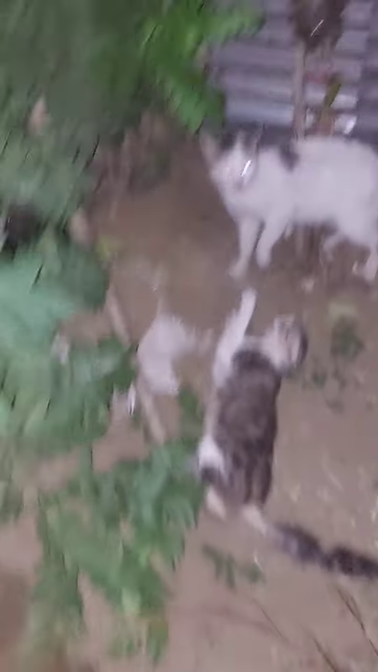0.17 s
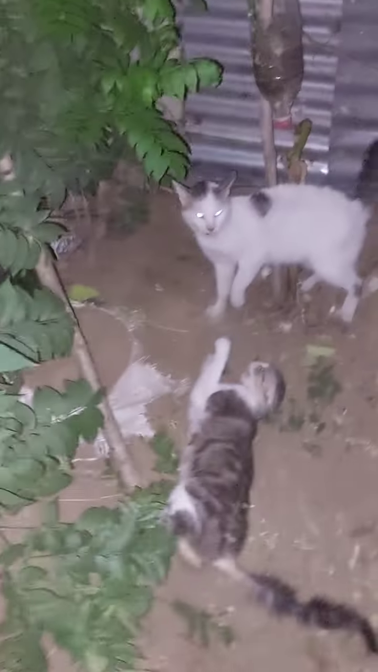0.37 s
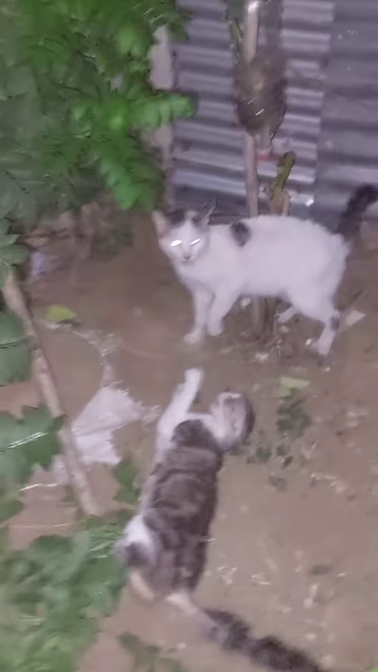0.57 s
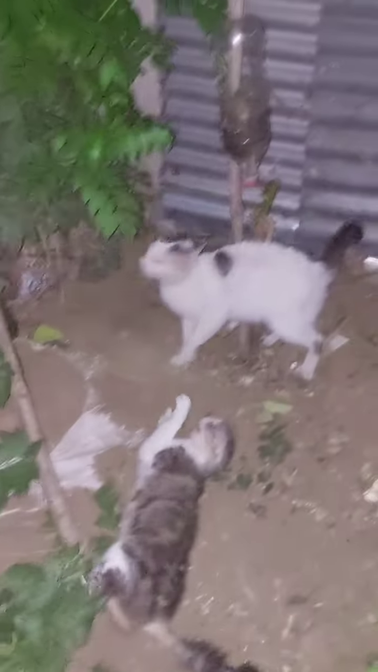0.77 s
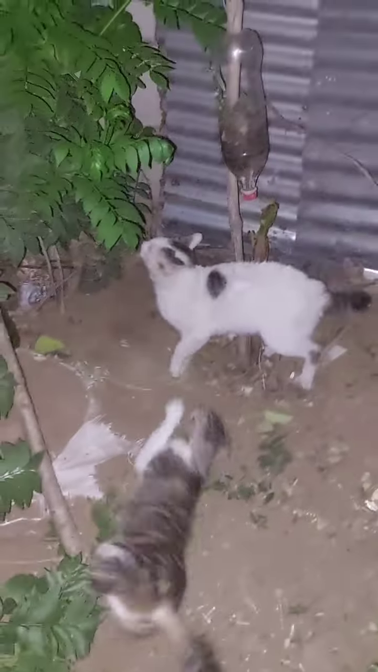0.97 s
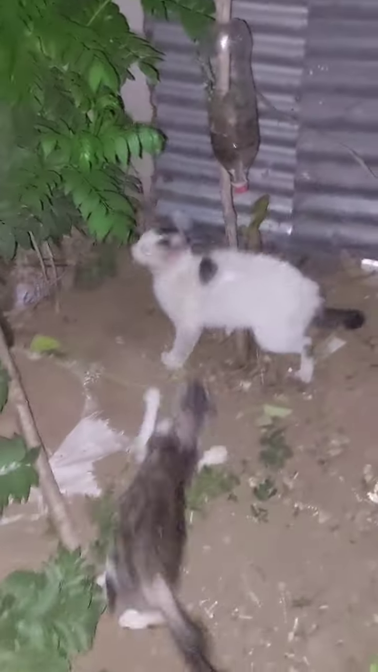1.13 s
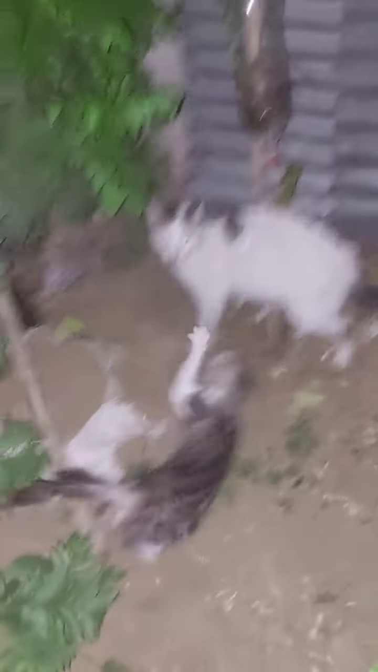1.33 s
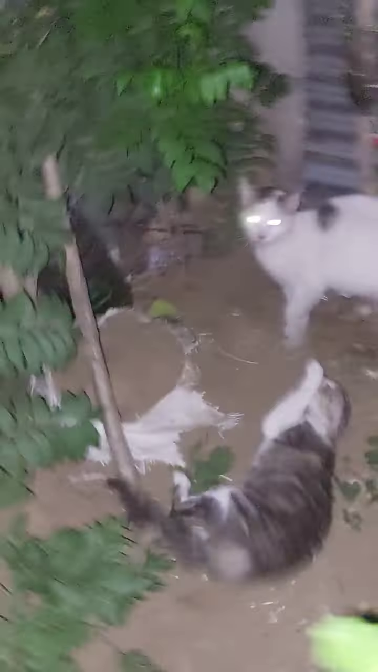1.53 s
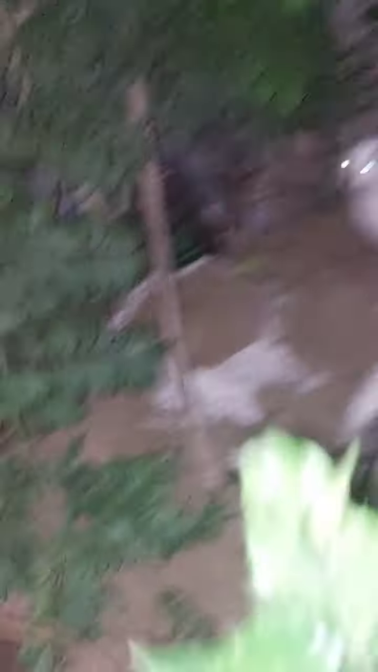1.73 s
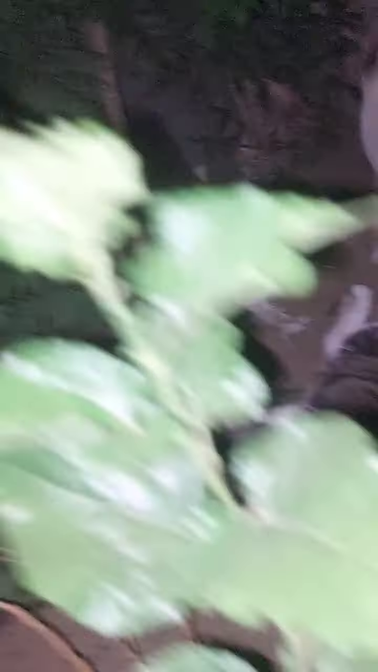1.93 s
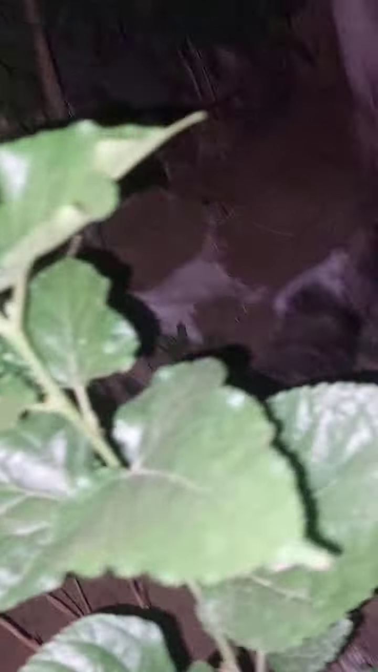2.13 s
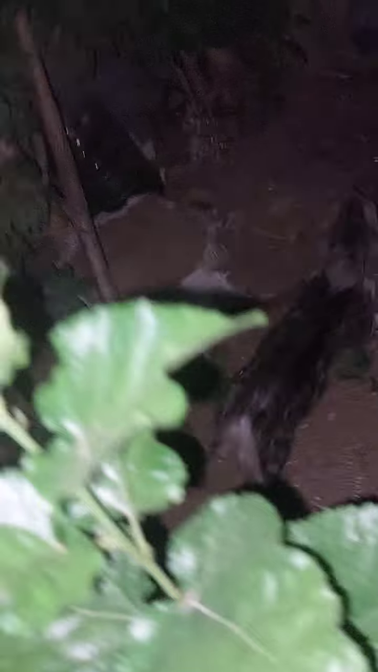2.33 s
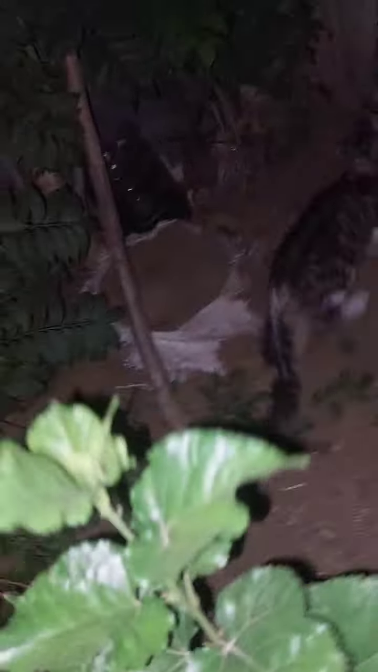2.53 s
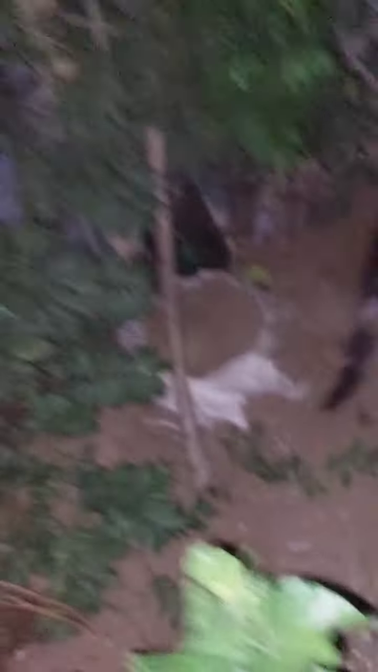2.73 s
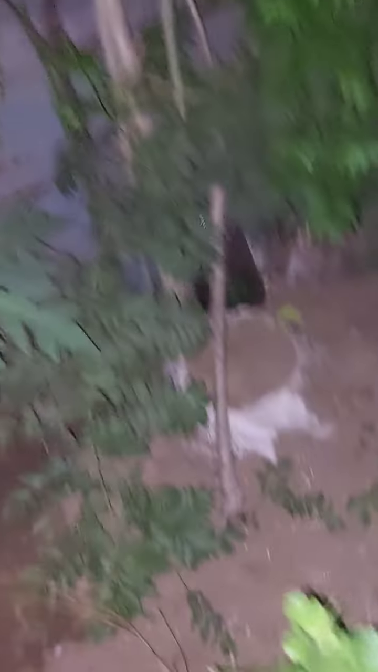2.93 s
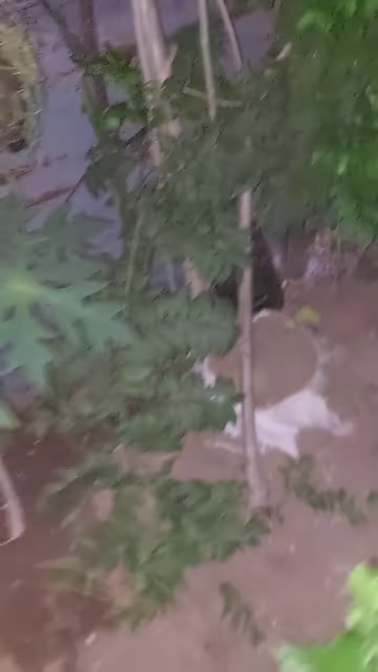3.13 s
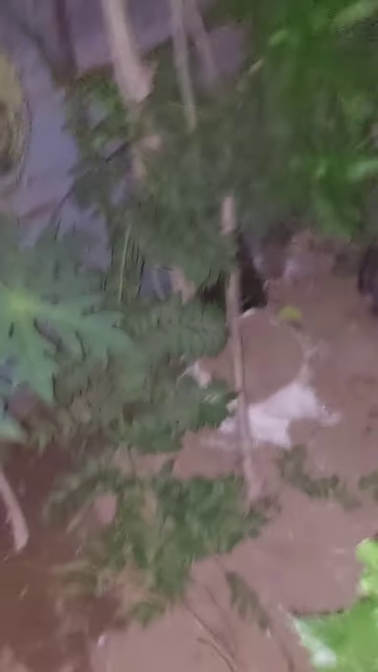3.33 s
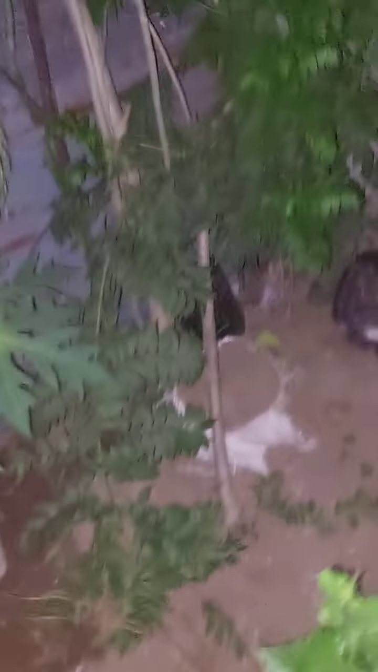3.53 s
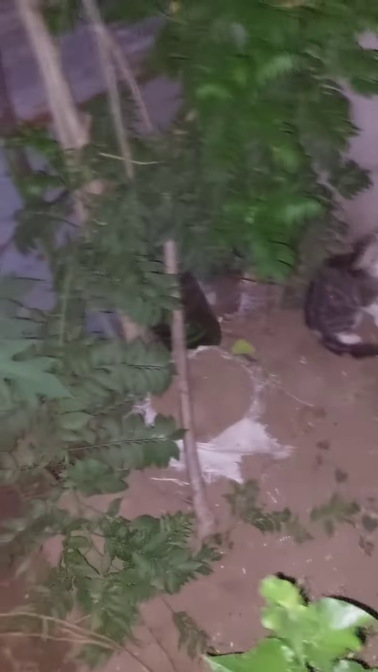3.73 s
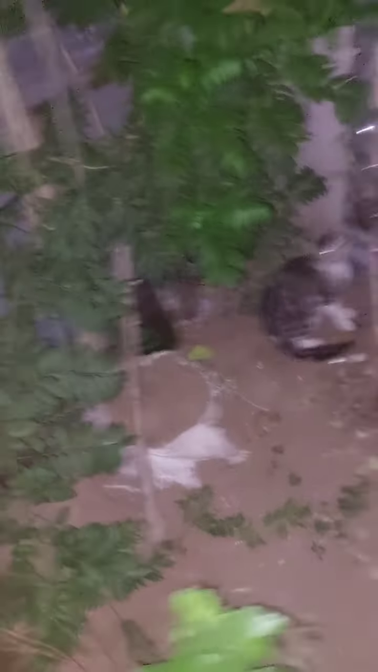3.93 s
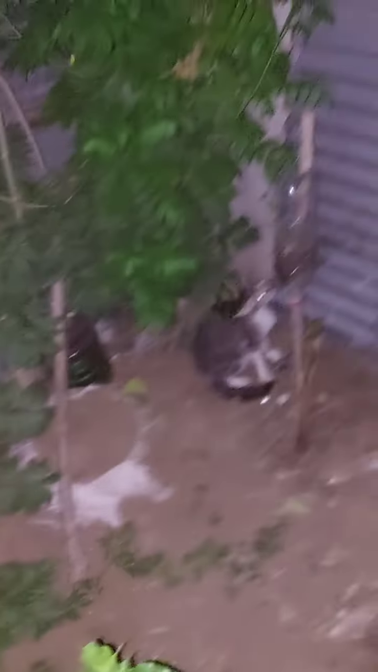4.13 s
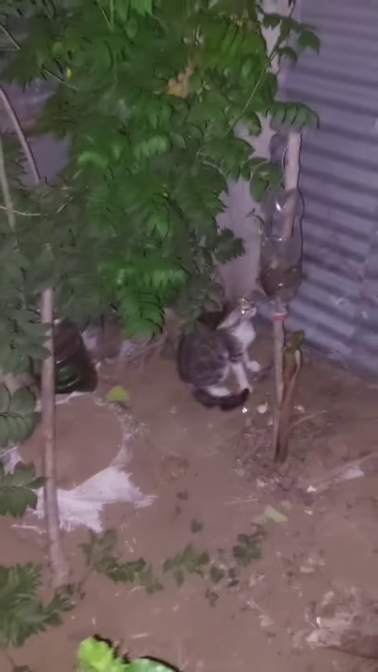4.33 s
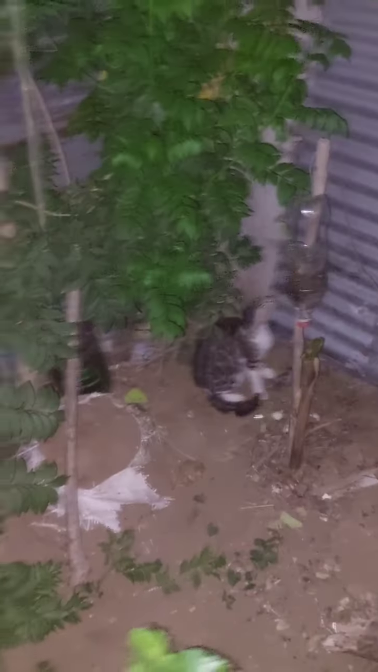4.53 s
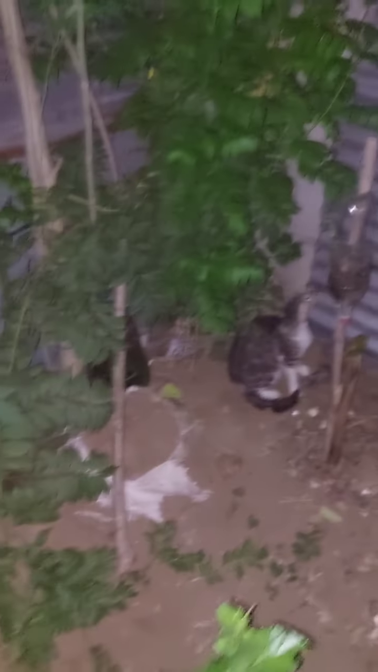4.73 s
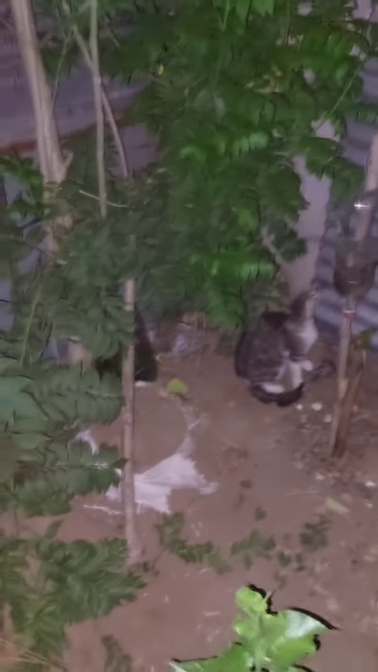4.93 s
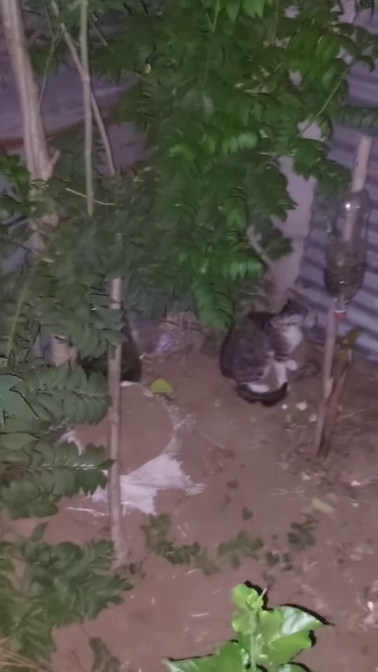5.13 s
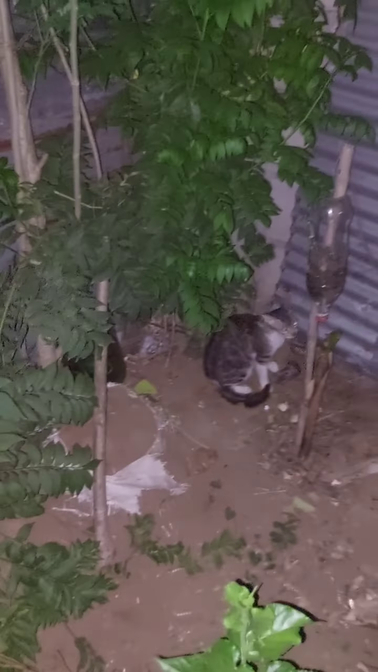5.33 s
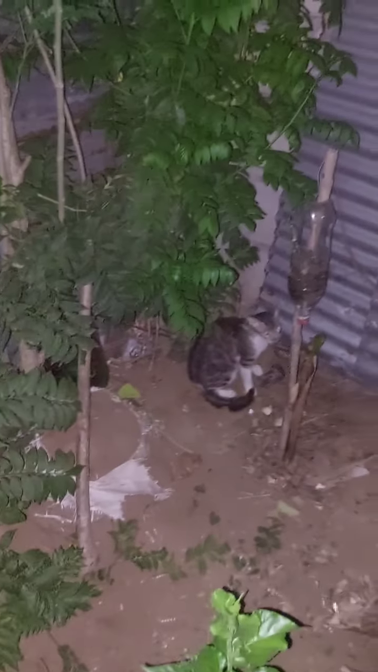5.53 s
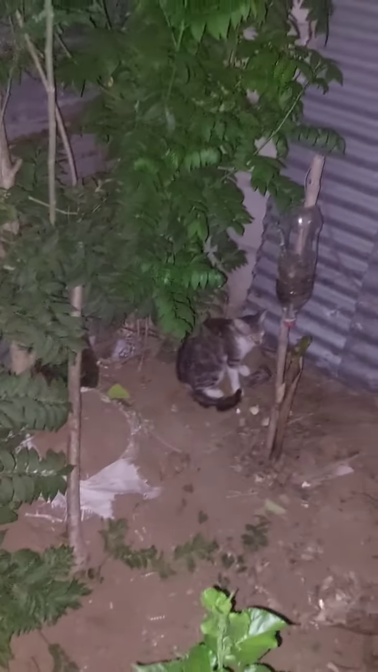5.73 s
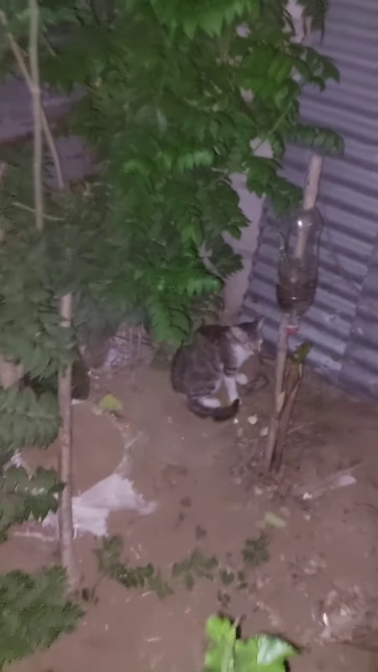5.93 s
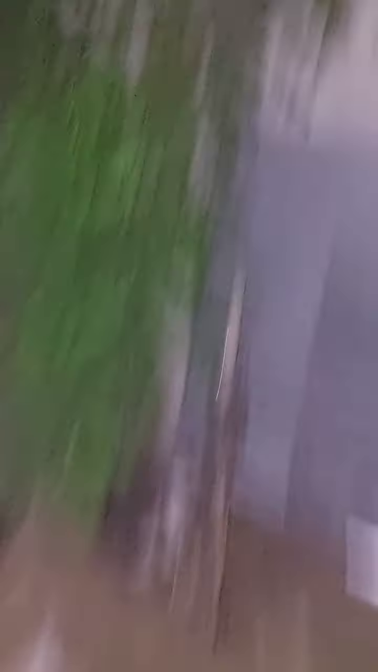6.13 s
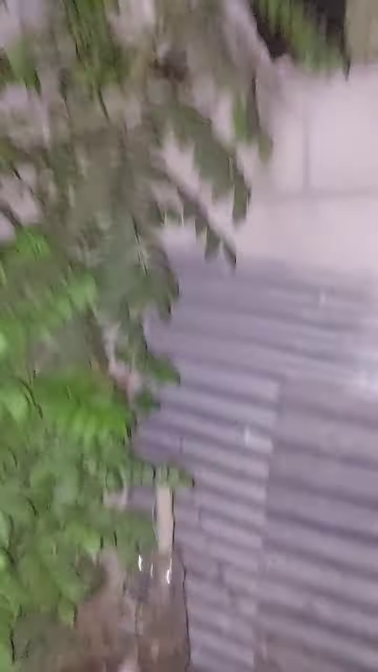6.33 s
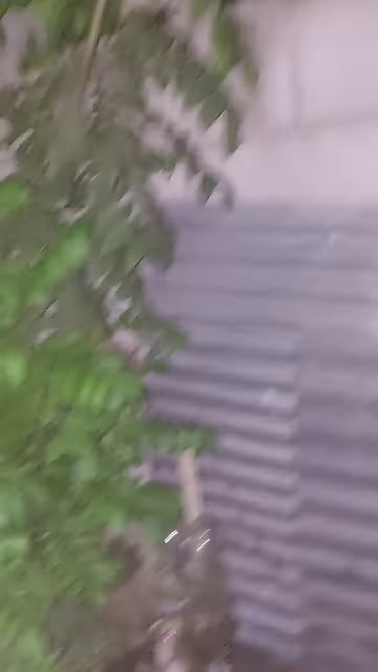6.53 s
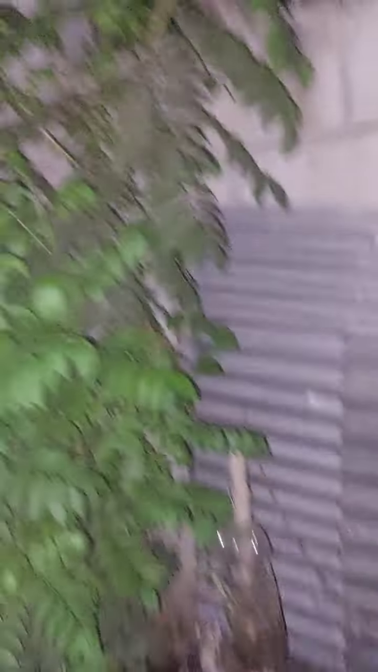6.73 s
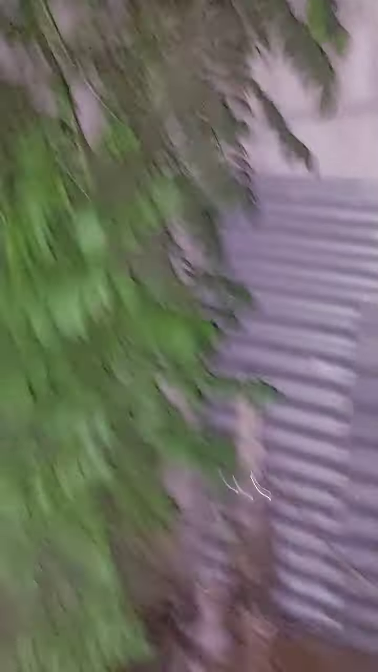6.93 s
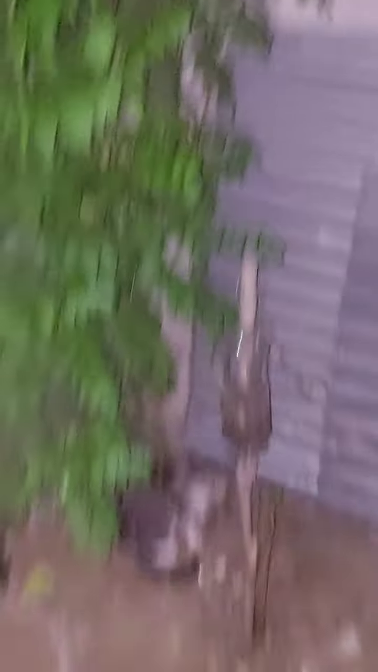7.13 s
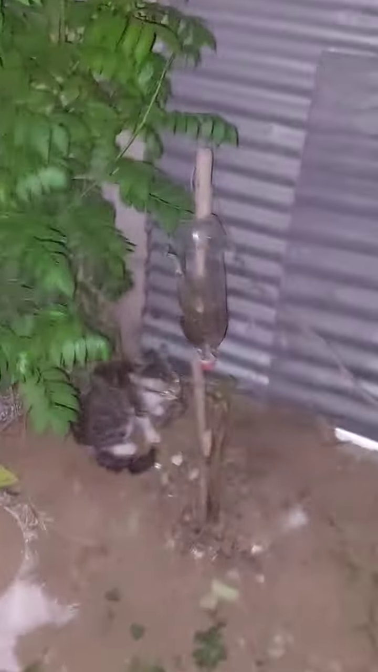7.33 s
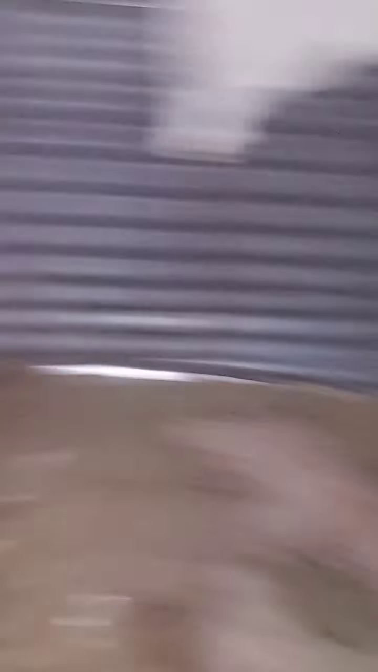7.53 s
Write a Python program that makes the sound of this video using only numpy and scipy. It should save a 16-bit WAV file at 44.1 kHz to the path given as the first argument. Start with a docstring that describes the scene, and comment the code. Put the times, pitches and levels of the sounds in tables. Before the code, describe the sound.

A handheld microphone hears a cat's yowl strain into a screech and end with a throaty grunt. Bodies then thump and scrape against a tin fence, leaves thrash, claws squeal on metal and a cat spits. After about four seconds the fight stops, leaving pulsing crickets, thin distant cries, hoarse far barks and a night bird. Late leaf brushes and a low puff of wind hit the microphone. Everything is on the right; dull hiss on the left.

```python
"""A yard at night: two cats face off. One long yowl of vocal-fold harmonics rises and breaks into a screech.
Then they scuffle: grain noise drums and scrapes on a tin fence and rustles in leaves, while gliding tones
squeak as claws on the sheet. Filtered noise trills as insects, a night bird chirps in falling tones, and
dogs bark far off in hoarse harmonics. Only the right microphone is open; the left one gives a dull hiss."""
import sys
import numpy as np
from scipy import signal
from scipy.fft import rfft, irfft, next_fast_len
from scipy.io import wavfile
from scipy.ndimage import uniform_filter1d, map_coordinates

SR = 44100
rng = np.random.default_rng(int(sys.argv[2]) if len(sys.argv) > 2 else 0)


def dump(signal):
    """Clip the signal to [-1, 1] and save it as 16-bit WAV at the path in sys.argv[1]."""
    limited = np.clip(np.atleast_2d(signal).T, -1, 1)
    pcm = np.round(limited * 32767).astype(np.int16)
    wavfile.write(sys.argv[1], SR, pcm)


N = 334260
T = np.arange(N) / SR
STRAIN_S = 0.88  # the cat's voice starts to strain here


def amp(db):
    """Gain of a level in dB."""
    return 10 ** (np.asarray(db) / 20)


def unit(x):
    """x at rms 1."""
    return x / np.sqrt(np.mean(x ** 2) + 1e-20)


def along(points, hz):
    """Read a (f/Hz, value) curve on a log frequency axis."""
    f, v = np.transpose(points)
    return np.interp(np.log(hz + 1), np.log(f + 1), v)


def curves(rows):
    """One value per sample for each column after the time."""
    s, *cols = np.transpose(rows)
    return [np.interp(T, s, c) for c in cols]


def during(rows):
    """1 over the time span of a table, with soft edges."""
    inside = (T >= rows[0][0]) & (T <= rows[-1][0])
    return uniform_filter1d(1. * inside, size=400)


def wobble(rate):
    """A smooth random curve, rate knots a second."""
    coarse_s = np.arange(N // 8 + 2) * 8 / SR  # drawn on every eighth sample
    knots = rng.standard_normal(8192)
    return np.interp(T, coarse_s, map_coordinates(knots, [coarse_s * rate], mode="wrap"))


def swell(s, rise_s, hold_s, fall_db_per_s):
    """An envelope that rises from time s to 1, holds and dies away."""
    rise = np.clip((T - s) / max(rise_s, 1 / SR), 0, 1)
    return rise * amp(-fall_db_per_s * np.maximum(T - s - rise_s - hold_s, 0))


def coloured(x, spectrum):
    """x through a (f/Hz, level/dB) spectrum, at rms 1."""
    size = next_fast_len(N + 8192)
    gain = amp(along(spectrum, np.fft.rfftfreq(size, 1 / SR)))
    return unit(irfft(rfft(x, size) * gain, size)[:N])


def noise(spectrum):
    """Steady noise of rms 1."""
    return coloured(rng.standard_normal(N), spectrum)


def grains(spectrum, rate, patchy_db):
    """Dense tiny contacts of uneven size; each patch of contact favours other frequencies."""
    hits = rng.standard_normal(N) * (rng.random(N) < rate / SR)
    z = signal.stft(hits, nperseg=512)[2]
    field = uniform_filter1d(rng.standard_normal(z.shape), size=6, axis=0)
    field = uniform_filter1d(field, size=6, axis=1)
    patchy = signal.istft(z * amp(patchy_db * unit(field)), nperseg=512)[1]
    return coloured(patchy[:N], spectrum)


def add(track, s, sound):
    """Mix a sound into a track at time s."""
    part = track[max(round(s * SR), 0):][:len(sound)]
    part += sound[:len(part)]


def bursts(rows, spectrum):
    """Bursts of small contacts that start at once and die away, for (t/s, level/dB, t60/s) rows."""
    force, t = np.zeros(N), np.arange(SR // 3) / SR
    for s, db, t60 in rows:
        add(force, s, amp(db - 9 - 60 * t / t60))
    return force * grains(spectrum, rate=9900, patchy_db=2)


def whistles(rows, waver, waver_rate):
    """Short gliding tones of unsteady pitch, for (t/s, length/s, f/Hz, glide/octaves, level/dB rms) rows."""
    out, drift = np.zeros(N), waver * wobble(waver_rate)
    for s, length, hz, glide, db in rows:
        u = np.linspace(0, 1, int(length * SR))
        pitch = hz * 2 ** (glide * (u - .5)) * (1 + drift[int(s * SR):][:len(u)])
        tone = np.sin(2 * np.pi * np.cumsum(pitch) / SR)
        add(out, s, amp(db) * unit(np.sin(np.pi * u) * tone))
    return out


def cat(width_hz=170, jitter=.013, shake=0.042, flutter=0.93, rasp=0.72, half_db=-5, teeth_db=-9, thin_db=5):
    """Fold harmonics pass the throat and a tuned mouth; under strain the folds shake and double their period."""
    # one long yowl that sags, climbs and ends in a screech: t/s, pitch/Hz, level/dB
    yowl_path = [(0.0, 569, -26), (0.018, 569.5, -27), (0.182, 546.5, -25.5), (0.392, 537.2, -28.5),
                 (0.494, 531.6, -26), (0.646, 542.9, -28.5), (0.742, 558.8, -23), (0.772, 593.7, -23),
                 (0.794, 595.7, -23), (0.936, 729.5, -26), (0.954, 819, -22.5), (0.966, 769, -30),
                 (0.984, 656.7, -30), (1.02, 621.6, -33), (1.04, 594, -24.5), (1.084, 607.8, -30.5),
                 (1.102, 647.3, -29), (1.128, 654.3, -26.5), (1.136, 704, -20), (1.144, 658, -24),
                 (1.154, 564.6, -28), (1.174, 536, -18.5), (1.2, 598, -26), (1.226, 547.5, -20.5),
                 (1.252, 620.3, -27.5), (1.27, 580.6, -28), (1.284, 593.4, -32.5), (1.3, 710, -25),
                 (1.335, 689.1, -49.5)]
    # throat resonances: f/Hz, level/dB
    throat = [(300, -17.5), (560, -13), (1100, -11), (1650, -2.5), (2200, -7.5), (2750, -6), (3250, -3),
              (3800, -21.5), (4350, -20.5), (4950, -16), (5600, -30.5), (7500, -34), (10000, -45.5),
              (15000, -43.5)]
    mouth_harmonic, mouth_max_hz = 3, 1990  # the mouth follows this harmonic but cannot tune higher
    air_db = -33  # faint throat turbulence, relative to the voice, even when it is pure
    pitch, level_db = curves(yowl_path)
    mouth_hz = np.minimum(mouth_harmonic * pitch, mouth_max_hz)
    rough, lift_db = roughness(), brightness(pitch, level_db)
    drift = .0015 * wobble(25)
    pitch = pitch * (1 + drift + shake * np.sqrt(rough) * wobble(130) + jitter * rough * wobble(600))
    phase = 2 * np.pi * np.cumsum(pitch) / SR

    live = T < yowl_path[-1][0] + .1
    strained = T[live] > STRAIN_S
    voice, power = np.zeros(N), np.full(N, 1e-12)
    for k in np.arange(1, 49) / 2:
        hz = k * pitch[live]
        # each harmonic swells and fades at random on its own
        flicker_db = min(.4 + .9 * abs(k - mouth_harmonic), 3.8) * wobble(10)[live]
        lift_share = along([(2200, 0.077), (3300, 0.28)], hz)
        colour_db = along(throat, hz) + lift_db[live] * lift_share + flicker_db
        colour_db = colour_db - thin_db * strained * (k <= 1)  # strain thins the fundamental and below
        gain = amp(colour_db) * (1 + 8 / (1 + ((hz - mouth_hz[live]) / width_hz) ** 2))
        if k % 1:
            # lines halfway between the harmonics
            gain = gain * amp(half_db) * np.sqrt(rough[live]) * strained
        fluttering = 1 + flutter * (rough ** 0.5 * wobble(220))[live]
        voice[live] += gain * np.sin(k * phase[live]) * fluttering
        power[live] += gain ** 2 / 2

    # turbulent air rings the same throat once a cycle, and whistles past the teeth
    teeth = noise([(2400, -35.0), (3300, -6), (3900, 6.5), (4400, -14.0), (5100, -6), (6500, -26.5)])
    air = (0.47 * noise(throat) + amp(teeth_db + lift_db) * teeth) * (1 + np.cos(phase))
    # a noisy band at the mouth's own resonance
    air = air + unit(wobble(520) * np.sin(2 * np.pi * np.cumsum(mouth_hz) / SR))
    tremble = amp(3.5 * np.sqrt(rough) * wobble(70))
    mixed = voice / np.sqrt(power) + amp(air_db) * noise(throat) + rasp * rough * air
    return during(yowl_path) * amp(level_db) * tremble * mixed / np.sqrt(1 + rough ** 2)


def roughness():
    """Roughness of the folds, 0-1: pure at first, then strained, and harsh wherever the voice cracks."""
    # the voice cracks: t/s, length/s, added roughness/0-1
    cracks = [(0.742, 0.1, 0.05), (0.944, 0.068, 0.22), (1.125, .09, .35), (1.197, 0.19, 0.25)]
    pure, strained = 0.003, 0.045
    rough = np.where(T < STRAIN_S, pure, strained)
    for s, length, harsh in cracks:
        rough = rough + harsh * np.sin(np.pi * np.clip((T - s) / length, 0, 1))
    return np.clip(rough, 0, 1)


def brightness(pitch, level_db):
    """Upper harmonics hold on as the voice fades, weaken as it climbs, and lift as the teeth are bared, in dB."""
    full_voice_db, dull_db_per_octave = -24, 17
    snarl_s, snarl_open_s, snarl_db = 1.19, .08, 10.5
    snarl = np.clip((T - snarl_s) / snarl_open_s, 0, 1)
    hold_db = np.minimum(full_voice_db - level_db, 6)
    return hold_db - dull_db_per_octave * np.log2(pitch / pitch.min()) + snarl_db * snarl


def grunt(count=5, uneven=0.35):
    """A short throaty grunt: a few slow, uneven fold pulses, each ringing the throat."""
    # throat resonances: f/Hz, width/Hz, level/dB
    grunt_throat = [(245, 15, 3.5), (1430, 170, -9), (1636, 98, 17), (2220, 240, 2.5)]
    start_s, pulse_hz, peak_db = 1.41, 87, -30.5  # the peak is that of each pulse
    out, t = np.zeros(N), np.arange(SR // 20) / SR
    for k in range(count):
        ring = np.zeros(len(t))
        for hz, width, level in grunt_throat:
            tone = np.sin(2 * np.pi * hz * rng.normal(1, 0.091) * t)
            ring += amp(level) * np.exp(-np.pi * width * t) * tone
        pulse_s = start_s + (k + uneven * rng.standard_normal()) / pulse_hz
        add(out, pulse_s, amp(peak_db) * ring / np.abs(ring).max())
    return out


def scuffle():
    """At each lunge bodies drum on the tin and scrape along it while leaves are crushed."""
    # the cats lunge at each other: t/s, rise/s, hold/s, drumming/dB, scrape/dB, rustle/dB
    lunges = [(1.385, 0.016, 0.019, -49.5, -47.5, -54.5), (1.592, 0.11, .01, -115, -57, -67.5),
              (1.7, .008, 0.042, -60, -47.5, -45), (1.757, 0.0052, 0.24, -50.5, -50.5, -54.5),
              (1.885, 0.21, .04, -42.5, -42.5, -45), (2.167, 0.018, 0.074, -44, -34, -22),
              (2.224, 0.097, 0.086, -34, -24, -27.5), (2.526, 0.056, .03, -42, -34.5, -33.5),
              (2.636, 0.059, .01, -35, -37.5, -46.5), (2.798, .025, 0.095, -37.5, -31.5, -39.5),
              (2.89, 0.055, 0.033, -38, -23, -36), (3.058, .02, .03, -38, -28, -41.5),
              (3.167, 0.023, .08, -29, -26.5, -38.5), (3.441, 0.0056, 0.0078, -39, -37, -37.5),
              (3.541, 0.0084, .02, -40.5, -40.5, -51.5), (3.699, 0.046, 0.068, -42.5, -40.5, -44.5),
              (3.865, 0.012, 0.011, -50, -47.5, -48.5), (3.93, .02, .06, -55.5, -62, -62)]
    # colours of the drumming tin, the scraped tin and the leaves: f/Hz, level/dB
    drum_colour = [(26, -38), (45, -21.5), (80, -0.5), (124, -8), (231, 3.5), (317, 1), (471, -3.5),
                   (676, -10), (800, -13.5), (1040, -43), (1760, -120)]
    scrape_colour = [(260, -36.5), (450, -3.5), (764, -7), (832, -0.5), (1620, -1.5), (1970, 0.5),
                     (2710, -8), (4950, -8), (5950, -19.5), (6980, -20), (8500, -34.5), (11000, -43.5),
                     (18700, -120)]
    rustle_colour = [(2650, -23.5), (4500, -5.5), (5270, -5.5), (5640, -9), (6370, -2), (7260, -3),
                     (8410, -9.5), (9540, -5.5), (10200, -5.5), (11100, -0.5), (12000, 0.5), (15800, -13)]
    falls_db_per_s = 104, 161, 272  # the tin rings on, the leaves settle first
    power = np.zeros((3, N))
    for s, rise_s, hold_s, *levels_db in lunges:
        power += [(amp(db) * swell(s, rise_s, hold_s, fall)) ** 2 for db, fall in zip(levels_db, falls_db_per_s)]
    drumming, scraping, rustling = np.sqrt(power)
    drum = drumming * grains(drum_colour, rate=900, patchy_db=0.5)
    scrape = scraping * grains(scrape_colour, rate=3500, patchy_db=3.5)
    rustle = rustling * grains(rustle_colour, rate=7700, patchy_db=4)
    return drum + scrape + rustle


def snaps():
    """Sudden bursts of contact grains: swipes and brushing leaves are bright, body blows are dull."""
    # sharp swipes, and later (from 6.195 s) leaves brushing the camera: t/s, level/dB, t60/s
    bright_hits = [(1.705, -30.5, 0.13), (1.767, -13, 0.0087), (1.906, -29, 0.061), (2.178, -24.5, 0.066),
                   (3.188, -22.5, 0.13), (3.444, -24.5, .12), (3.789, -23, 0.059), (4.16, -45.5, 0.14),
                   (6.195, -47.5, 0.4), (6.214, -32.5, 0.083), (6.24, -38, 0.09), (6.32, -50.5, 0.78),
                   (6.7, -46, .3), (6.725, -36, 0.14)]
    # bodies thud against the fence: t/s, level/dB, t60/s
    body_hits = [(2.249, -20, 0.15), (2.345, -23.5, .3), (2.778, -16, 0.34), (3.187, -17, 1)]
    bright = [(100, -11.0), (400, 1.5), (2000, 2.0), (5000, -1.0), (9000, -6.5), (12500, -4.0), (16000, -6.5)]
    dull = [(40, -19.5), (100, -15.5), (300, 11.5), (1300, -9.5), (3000, -12.5), (9000, -51)]
    return bursts(bright_hits, bright) + bursts(body_hits, dull)


def spit():
    """A cat hisses in the struggle: air forced past bared teeth as grainy noise."""
    # hisses: t/s, rise/s, hold/s, level/dB
    hisses = [(2.81, 0.018, 0.035, -33.5), (2.89, 0.041, .025, -27.5)]
    fall_db_per_s = 293
    breath = sum(amp(db) * swell(s, rise_s, hold_s, fall_db_per_s) for s, rise_s, hold_s, db in hisses)
    teeth = [(1500, -25.5), (2800, -2.5), (3600, -1), (5200, -1.5), (6000, -12), (9000, -25.5)]
    return breath * grains(teeth, rate=6400, patchy_db=0)


def claws(scatter_hz=260):
    """Stick and slip on the sheet: a tone whose frequency jumps about from slip to slip."""
    # claws slip: t/s, length/s, f/Hz, glide/octaves, level/dB rms
    slips = [(2.18, 0.03, 7400, -0.03, -30.5), (2.191, .04, 4044, -0.028, -26),
             (2.203, 0.023, 6350, 0, -29.5), (2.254, 0.07, 10380, -0.053, -26.5),
             (2.286, 0.025, 5350, -0.18, -29), (2.353, .014, 11760, 0.005, -19.5),
             (2.385, .01, 13100, .08, -17.5), (2.389, .03, 13200, 0, -26.5),
             (2.43, 0.021, 4770, -0.052, -37), (2.553, .06, 7480, -0.266, -37),
             (2.678, 0.027, 12860, 0.093, -39.5)]
    return sum(whistles([row], waver=scatter_hz / row[2], waver_rate=1600) for row in slips)


def ping():
    """One small clear ping: a short, slightly wavering tone."""
    # t/s, length/s, f/Hz, glide/octaves, level/dB rms
    ping_tone = [(6.318, 0.017, 1320, -0.037, -47.5)]
    return whistles(ping_tone, waver=0.037, waver_rate=110)


def buffet():
    """Air pushes ever harder on the microphone as it swings round, then lets go; pressure is speed squared."""
    # colour of the puff: f/Hz, level/dB
    puff_colour = [(15, -45), (30, -19), (50, -2.5), (136, 0), (221, -16.5), (339, -24.5), (500, -42),
                   (650, -66), (1100, -120)]
    speed = swell(6.21, rise_s=0.163, hold_s=0.036, fall_db_per_s=500)
    return amp(-29) * speed ** 2 * noise(puff_colour)


def echo(x, stretch):
    """The yard's diffuse answer, a decaying noise tail; stretch lengthens it for far sources."""
    # decay of the yard at stretch 1: f/Hz, t60/s
    yard_decay = [(200, 0.41), (1500, 0.38), (6000, 0.31), (14000, 0.23)]
    hz, t, z = signal.stft(rng.standard_normal(SR), SR, nperseg=256)
    t60 = stretch * along(yard_decay, hz)[:, None]
    tail = signal.istft(z * amp(-60 * t / t60), SR, nperseg=256)[1]
    return signal.fftconvolve(x, tail / np.linalg.norm(tail))[:N]


def dogs(arch=0.201, width_hz=180, wall_s=0.076, half_db=-5):
    """Each hoarse bark arches in pitch and doubles its period; a wall repeats it, distance adds a long echo."""
    # far barks: t/s, length/s, nominal pitch/Hz, throat resonance/Hz, level/dB
    barks = [(0.01, 0.091, 282.3, 833, -56), (0.225, 0.11, 289.7, 990, -57.5),
             (5.115, 0.12, 284.3, 1075, -45.5), (5.534, 0.1406, 320.5, 654, -39),
             (5.72, 0.19, 270, 600, -48.5), (6.605, 0.13, 282.7, 850, -46),
             (7.004, 0.055, 283.7, 754, -57.5)]
    # colour of the bark: f/Hz, level/dB
    bark_colour = [(200, -46), (420, -1.5), (600, 0), (1100, -6.5), (1400, -13.5), (1750, -7),
                   (2300, -24.5), (4000, -41)]
    out = np.zeros(N)
    shake, air = .045 * wobble(160), .35 * noise(bark_colour)
    k = np.arange(2, 21)[:, None] / 2  # harmonics and the lines halfway between
    for s, length, pitch_hz, throat_hz, db in barks:
        u = np.linspace(0, 1, int(length * SR))
        here = slice(int(s * SR), int(s * SR) + len(u))
        pitch = pitch_hz * (1 + arch * (np.sin(np.pi * u) - .8) + shake[here])
        resonance = 1 + 2 / (1 + ((k * pitch - throat_hz) / width_hz) ** 2)
        gain = amp(along(bark_colour, k * pitch) + half_db * (k % 1 > 0)) * resonance
        turns = k * np.cumsum(pitch) / SR + rng.random(k.shape)
        voice = unit(np.sum(gain * np.sin(2 * np.pi * turns), axis=0))
        add(out, s, amp(db) * unit(np.sin(np.pi * u) * (voice + air[here])))
    return .7 * out + .3 * np.roll(out, int(wall_s * SR)) + .55 * echo(out, stretch=1.4)


def yelps(fourth_db=-6):
    """Thin cries from other yards, blurred by distance, with octave overtones."""
    # t/s, length/s, f/Hz, glide/octaves, fundamental level/dB, overtones relative to it/dB
    cry_notes = [(4.197, 0.0655, 1163, 0.056, -73, 7), (4.36, 0.069, 830, 0.1, -61, -28),
                 (4.374, 0.08, 1077, 0.074, -70.5, 1.5), (4.53, 0.049, 1163, -0.023, -62.5, 0),
                 (4.673, 0.096, 1164, 0.116, -61.5, -1), (4.846, 0.0865, 1055, 0.069, -64.5, 0),
                 (4.86, 0.109, 1477, -0.084, -60, -8.5), (5.043, 0.046, 1115, -0.076, -50, -16),
                 (6.096, 0.081, 812, -0.05, -59.5, -34), (6.374, 0.1, 610, 0.093, -56.5, -12),
                 (7.04, 0.17, 790, -0.14, -66.5, -26)]

    def partial(k, rows):
        """The cries at k times their pitch."""
        raised = [(s, length, k * hz, glide, db) for s, length, hz, glide, db in rows]
        return whistles(raised, waver=0.025 * np.sqrt(k), waver_rate=300)

    first = [row[:5] for row in cry_notes]
    upper = [(*row[:4], row[4] + row[5]) for row in cry_notes]
    cries = partial(1, first) + partial(2, upper) + amp(fourth_db) * partial(4, upper)
    return .5 * cries + 0.53 * echo(cries, stretch=3.3)


def bird(gap=.08, note_hz=3300, second_db=4):
    """Pairs of falling notes, the second one stronger, far away."""
    # pairs of notes: t/s, level of the first note/dB
    note_pairs = [(4.407, -61.5), (5.53, -55.5), (6.449, -63), (7.179, -63)]
    rows = [(s + k * gap, .06, note_hz, -.2, db + k * second_db) for s, db in note_pairs for k in range(2)]
    notes = whistles(rows, waver=0.018, waver_rate=590)
    return 0.45 * notes + 0.28 * echo(notes, stretch=1.1)


def insects(depth_db=2, pulse_hz=10.7):
    """A chorus of bush crickets as a band of noise; the nearest one pulses and grows clearer."""
    # loudness of the chorus: t/s, level/dB
    chorus_level = [(1.3, -64.5), (4.1, -63), (4.8, -58.5), (6.2, -57), (7.58, -60)]
    # colour of the trill: f/Hz, level/dB
    trill_colour = [(5800, -29.5), (6550, -18), (6800, -8.5), (7200, 3.5), (7800, -1.5), (8080, -5.5),
                    (8280, -20.5), (9000, -17.5), (10000, -46), (12000, -64)]
    level_db, = curves(chorus_level)
    beat = np.sin(2 * np.pi * np.cumsum(pulse_hz * (1 + .025 * wobble(2))) / SR)
    near = np.interp(T, [4, 5.2], [.3, 1])
    chorus = noise(trill_colour) * amp(depth_db * near * beat)
    edge = noise([(7600, -55.5), (7950, 1), (8130, -4), (8350, -68.5)]) * np.maximum(beat, 0) ** 4
    return amp(level_db) * (chorus + 0.96 * near * edge)


def scene():
    """Everything reaches the right microphone; the left carries only its own hiss."""
    # background levels: t/s, night air/dB, left hiss/dB
    floor_levels = [(0, -76.5, -72), (1.2, -74, -67), (2.2, -58.5, -59.5), (4.3, -65.5, -61),
                    (4.8, -61.5, -54)]
    # colours of the night air and the left hiss: f/Hz, level/dB
    night_colour = [(18, -32.5), (30, -19.5), (59, 2.5), (127, -2), (596, -11), (680, -10.5), (816, -9.5),
                    (1380, -20), (2040, -29), (6000, -29.5), (15000, -32)]
    hiss_colour = [(25, -13.5), (60, 3.5), (120, 1.5), (300, -4), (700, -14), (2000, -21.5), (4000, -31.5),
                   (7000, -42), (15000, -47.5)]
    night_db, hiss_db = curves(floor_levels)
    yowl = cat() + grunt()
    fight = scuffle() + snaps() + spit()
    squeaks = claws() + ping()
    to_yard = amp(-11) * yowl + amp(-10) * fight + amp(-4.0) * squeaks
    near = yowl + fight + squeaks + echo(to_yard, stretch=.9)
    night_air = amp(night_db) * grains(night_colour, rate=31000, patchy_db=2.0)
    far = dogs() + yelps() + bird() + insects() + night_air
    left = amp(hiss_db) * noise(hiss_colour)
    right = amp(6.0) * (near + far + buffet())
    return np.array([left, right])


def record(dry):
    """Peaks are rounded off and nothing passes the band limit."""
    top_hz = 15900
    held = dry / (1 + (dry / .9) ** 8) ** (1 / 8)
    return irfft(rfft(held) * (np.fft.rfftfreq(N, 1 / SR) < top_hz), N)


dry = scene()
out = record(dry)
dump(out)
```